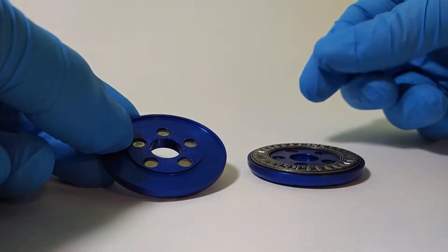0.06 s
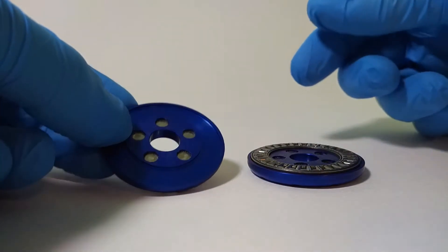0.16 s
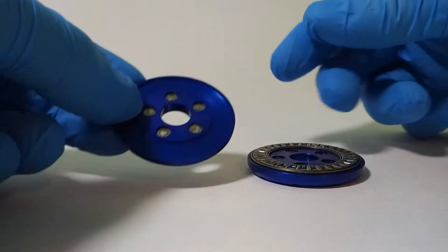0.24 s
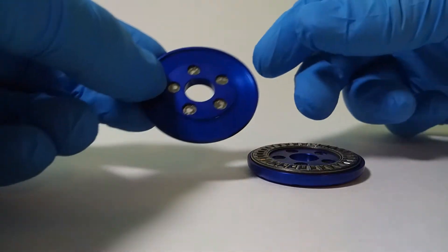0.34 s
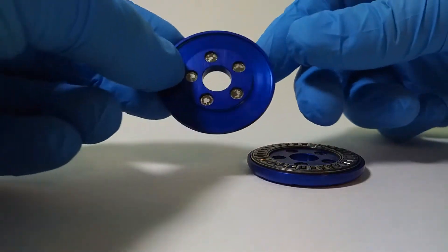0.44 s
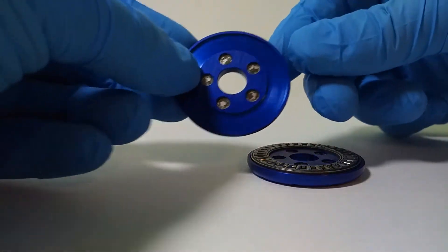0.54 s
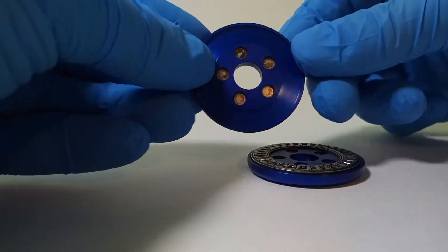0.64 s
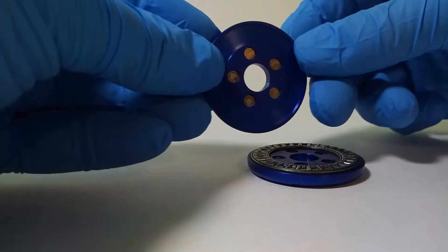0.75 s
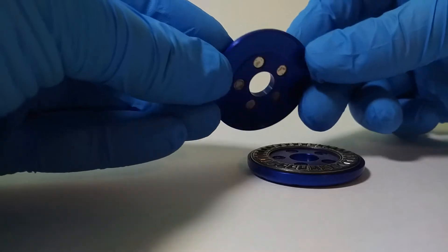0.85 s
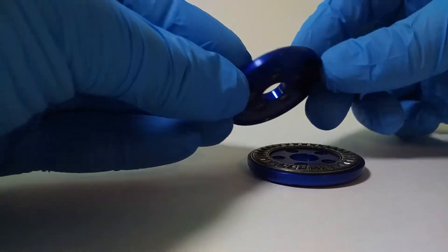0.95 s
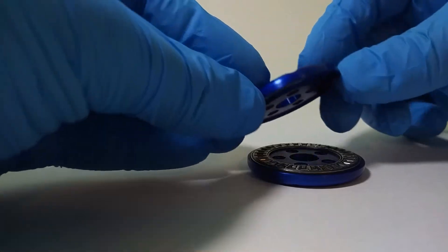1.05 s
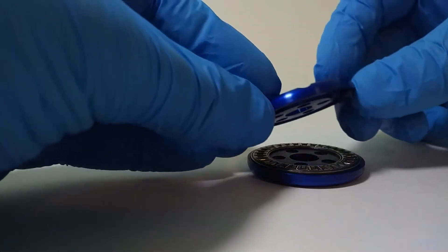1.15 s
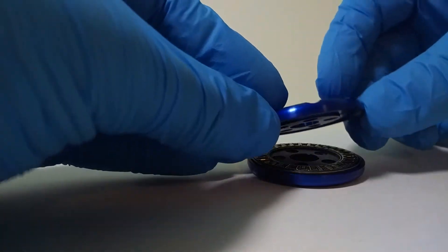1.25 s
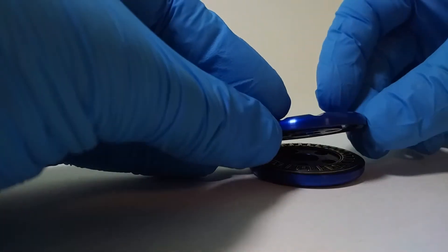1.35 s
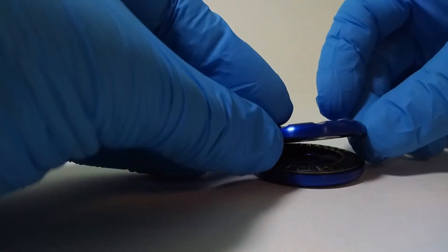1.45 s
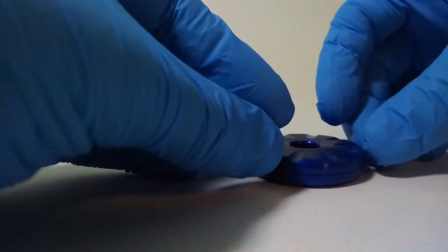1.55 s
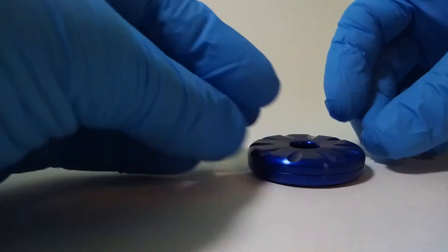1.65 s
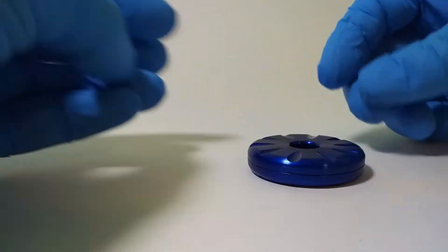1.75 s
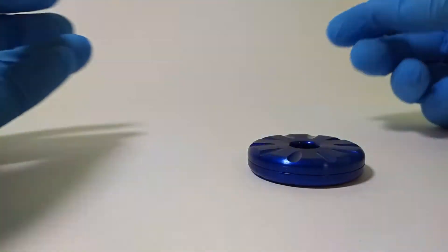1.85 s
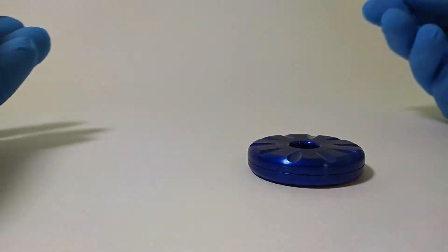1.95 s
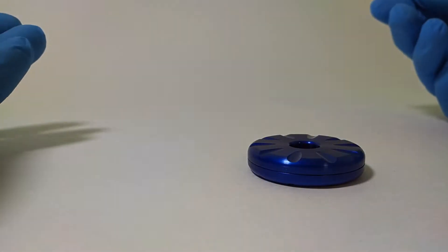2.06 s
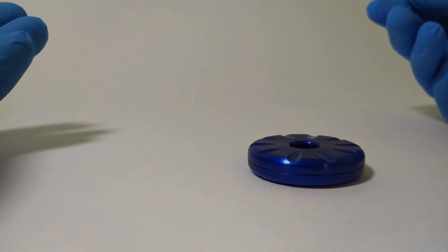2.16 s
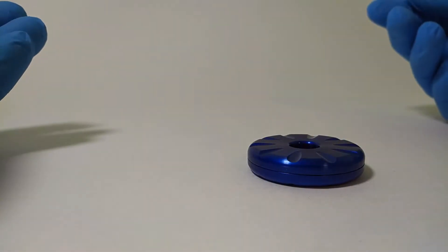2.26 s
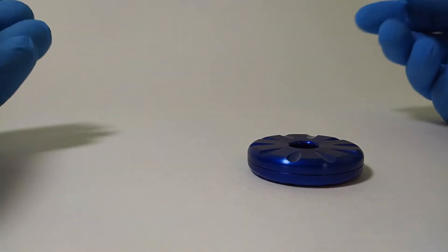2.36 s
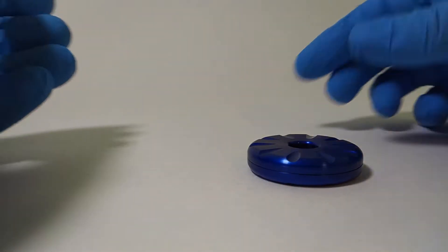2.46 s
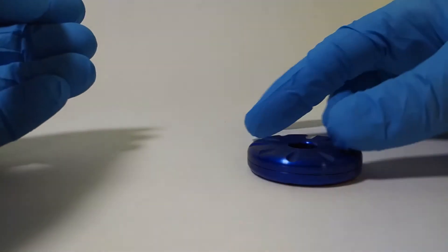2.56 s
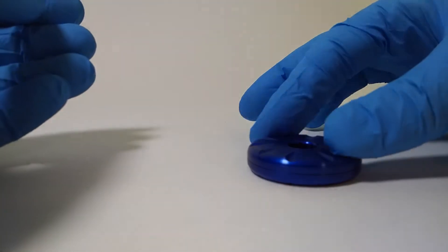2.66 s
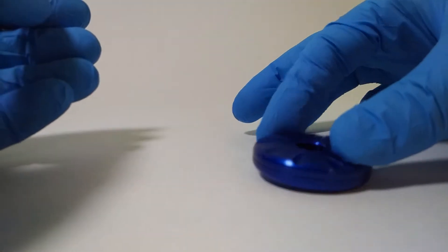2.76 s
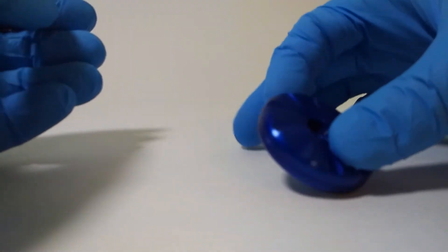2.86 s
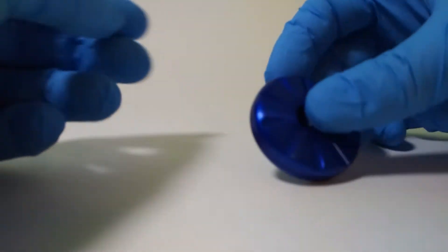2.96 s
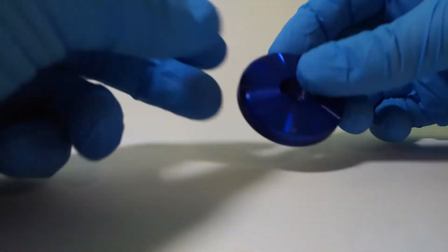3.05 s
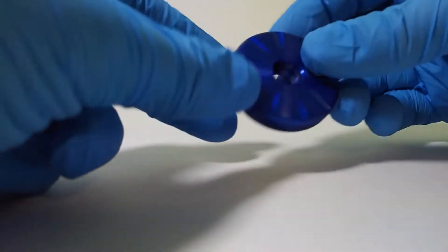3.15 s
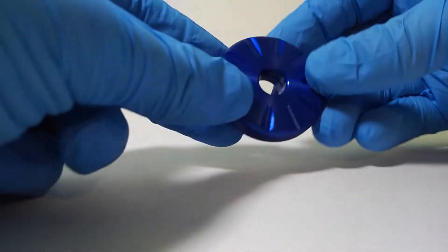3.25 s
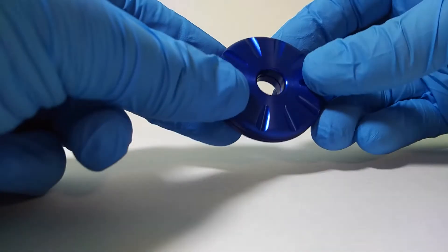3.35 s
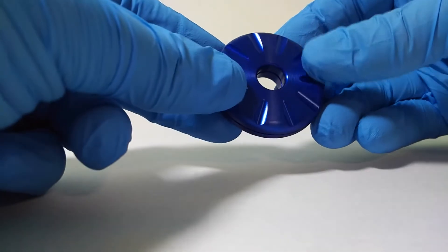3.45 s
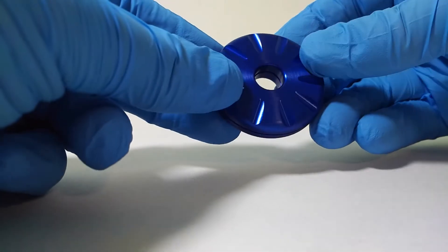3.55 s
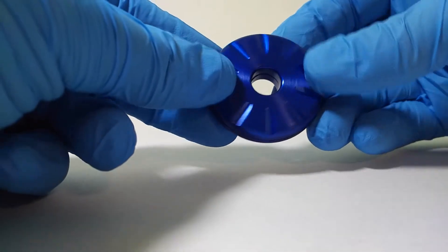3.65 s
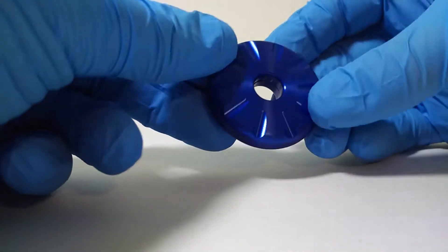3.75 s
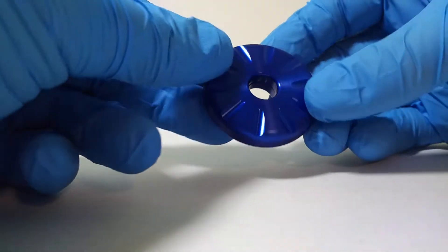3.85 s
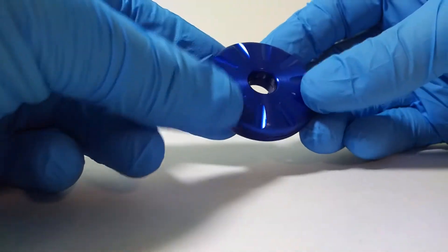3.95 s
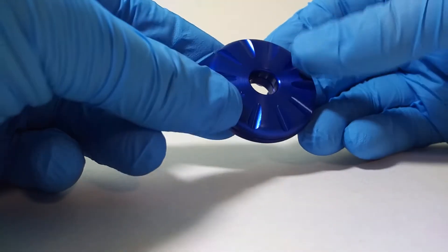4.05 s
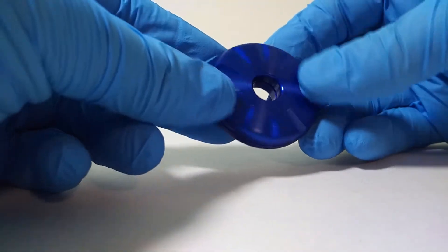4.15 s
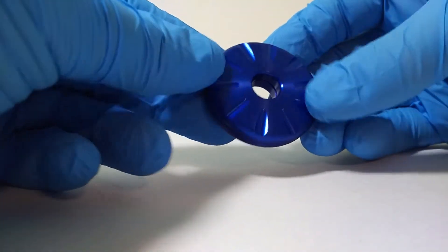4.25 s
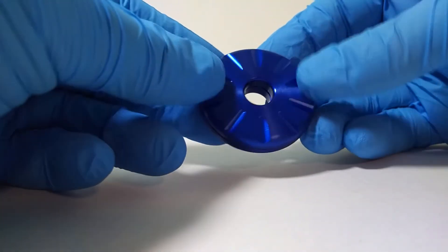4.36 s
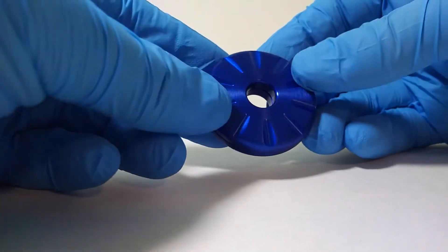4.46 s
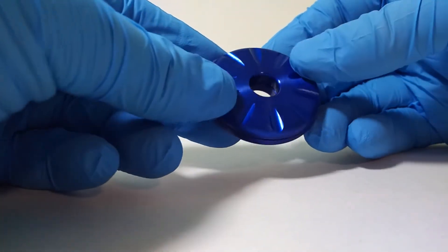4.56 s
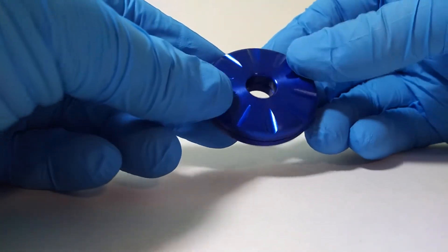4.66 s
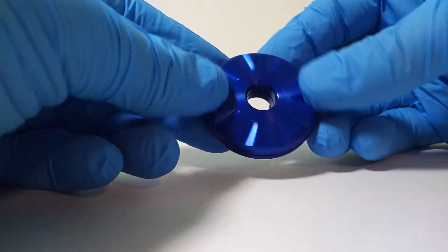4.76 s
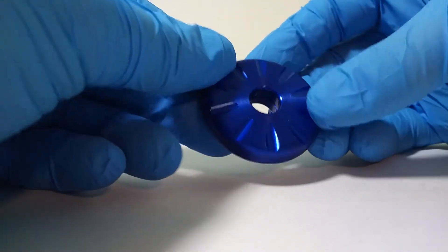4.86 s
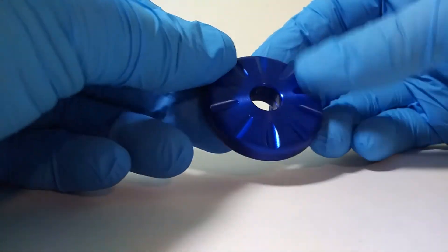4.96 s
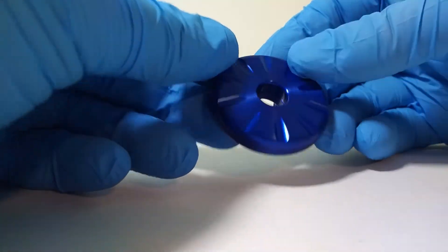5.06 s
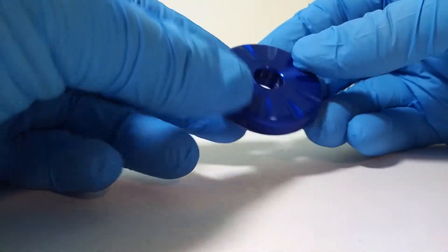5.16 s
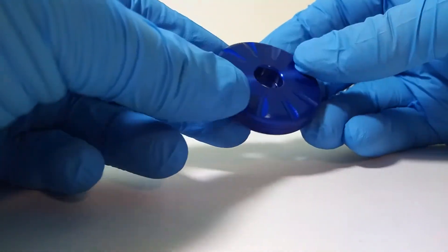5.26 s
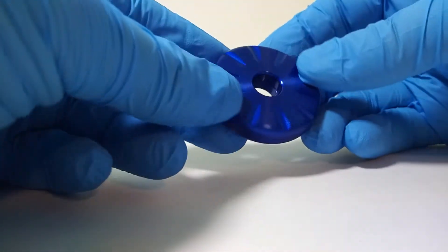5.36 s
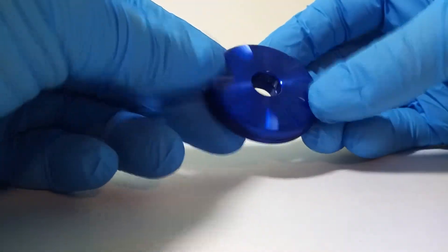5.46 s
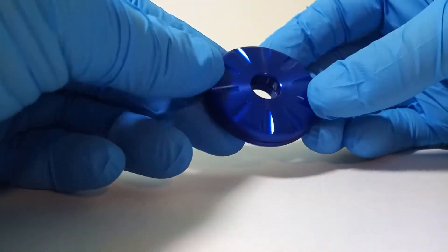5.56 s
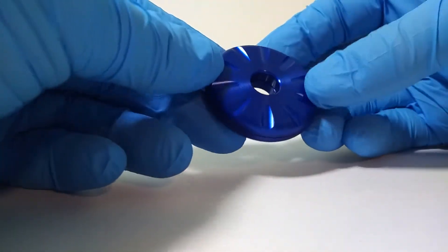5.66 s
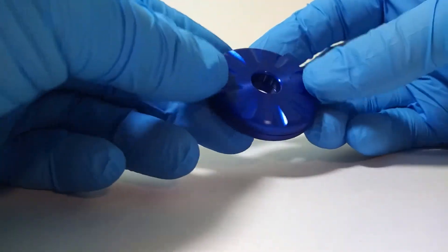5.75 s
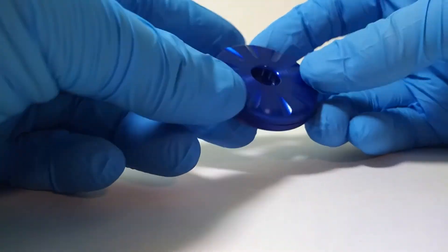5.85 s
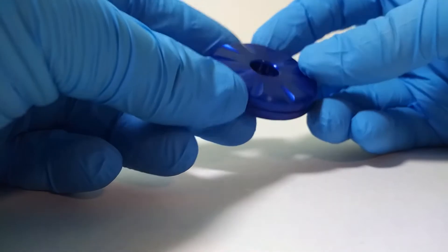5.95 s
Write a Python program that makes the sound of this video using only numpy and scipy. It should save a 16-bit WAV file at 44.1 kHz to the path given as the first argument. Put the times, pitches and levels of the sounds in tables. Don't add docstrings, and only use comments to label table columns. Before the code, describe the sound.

Two small metal discs clack together hard on a desk amid glove rustling, then are lifted and turned with four ratchety metallic clicks.

```python
import sys
import numpy as np
from scipy import signal
from scipy.fft import rfft, irfft
from scipy.io import wavfile
from scipy.ndimage import uniform_filter1d

SR = 44100
rng = np.random.default_rng(int(sys.argv[2]) if len(sys.argv) > 2 else 0)


def materialize(psi):
    bounded = np.clip(np.atleast_2d(psi).T, -1, 1)
    quanta = np.round(bounded * 32767).astype(np.int16)
    wavfile.write(sys.argv[1], SR, quanta)


def gain_from_db(level_db):
    decades = np.asarray(level_db, float) / 20
    return 10 ** decades


N = 264908

# start in [s], crack level in [dB], level of the singing rim in [dB].
SHELL_BLOWS = [
    (1.6278, -16, -5),
    (1.6302, -19, -14),
    (1.6324, -13.5, -7.5),
    (1.636, -12, -7),
    (1.6345, -12.5, -7.5),
    (1.642, -15.5, -5),
    (1.6475, -15, -14.5),
]
# peak in [s], grind level in [dB], rise in [s], fall in [s], jolt in the arms in [dB].
MAGNET_JUMPS = [
    (3.806, -25, 0.0095, 0.0082, -37.5),
    (4.29, -27, 0.018, 0.007, -30),
    (4.901, -17.5, 0.0079, 0.0062, -35.5),
    (5.539, -24.5, 0.0073, 0.01, -36),
]


def level(x, db):
    return x * gain_from_db(db) / np.sqrt(np.mean(x ** 2))


def noise(channels=2, size=N):
    return rng.standard_normal((channels, size))


def stereo(likeness_hz, size=N):
    b, a = signal.butter(1, likeness_hz, fs=SR)
    mid = noise(channels=1, size=size)
    own = noise(size=size)
    return own + signal.lfilter(b, a, mid - own)


def grains(rate, scatter_db):
    hit = (rng.random(N) < rate / SR) * gain_from_db(scatter_db * rng.exponential(size=N))
    return level(hit * (noise(channels=1) + 2.3 * noise()), 0)


def flicker(rate, depth_db):
    hold = int(SR / rate)
    steps = np.repeat(rng.standard_normal(N // hold + 1), hold)
    return gain_from_db(depth_db * uniform_filter1d(steps, hold)[:N])


def swells(t, rows):
    roundness = 1.58
    u = t[::32]
    gain = 0
    for s, db, rise, fall in rows:
        gain = gain + gain_from_db(db) * np.exp(-np.maximum((s - u) / rise, (u - s) / fall) ** roundness)
    return np.interp(t, u, gain)


def colour(x, points):
    hz, db = np.transpose(points)
    size = 2 ** 11
    bins_hz = np.arange(1, size // 2 + 2) * SR / size
    cep = irfft(np.interp(np.log(bins_hz), np.log(hz), db) * np.log(10) / 20)
    cep[1:size // 2] *= 2
    cep[size // 2 + 1:] = 0
    impulse = irfft(np.exp(rfft(cep)))
    return signal.fftconvolve(np.atleast_2d(x), impulse[None], axes=1)[:, :N]


def band(x, hz, width):
    return signal.lfilter(*signal.iirpeak(hz, hz / width, SR), x)


def ring(x, modes):
    out = 0
    for hz, db, t60 in modes:
        r = np.exp(-np.log(1000) / t60 / SR)
        w = 2 * np.pi * hz / SR
        out = out + signal.lfilter([0, gain_from_db(db) * r * np.sin(w)], [1, -2 * r * np.cos(w), r ** 2], x + 1e-18)
    return out


def clicks(rows, spread, ragged):
    out = np.zeros((2, N))
    shape = ragged * rng.standard_normal((len(rows), 2, 24))
    shape[:, :, 0] = 1
    shape = shape * np.exp(-np.arange(24) / spread)
    for (s, db), pair in zip(rows, shape):
        for c, lag in enumerate([0, 6]):
            i = int(s * SR) + lag
            out[c, i:i + 24] += gain_from_db(db) * pair[c]
    return out


def pings(rows, width_s, right_db):
    out = np.zeros((2, N))
    u = np.arange(-60, 60) / SR
    for (s, db, hz), (detune, phase) in zip(rows, rng.standard_normal((len(rows), 2))):
        port_hz = hz * (1 + np.array([[0], [.06 * detune]]))
        turn = 2 * np.pi * port_hz * u + np.array([[0], [phase]])
        i = int(s * SR)
        out[:, i - 60:i + 60] += gain_from_db([[db], [db + right_db]]) * np.exp(-(u / width_s) ** 2) * np.sin(turn)
    return out


def room(x):
    # frequency in [Hz], reverb time in [s].
    reverb_times = [(150, 0.31), (600, 0.61), (2500, 0.73), (6000, 0.42), (11000, 0.36), (16000, 0.096)]
    hz, t60 = np.transpose(reverb_times)
    t = np.arange(SR) / SR
    tail = 0
    for f in 68.9 * 2 ** np.arange(0, 8.1, .5):
        decay = gain_from_db(-60 * t / np.interp(np.log(f), np.log(hz), t60))
        tail = tail + band(stereo(330.0, size=SR), f, f / 3) * decay
    tail = tail * (1 - np.exp(-t / .006))
    return signal.fftconvolve(x, tail, axes=1)[:, :N]


def air(t):
    # frequency in [Hz], level in [dB].
    air_spectrum = [(30, 4), (60, 29), (120, 22), (300, 13), (700, 10), (1500, 10.5), (3700, -6),
                    (6000, -4.5), (9000, -15), (16000, -6.5)]
    # frequency in [Hz], rms level in [dB].
    appliance_tones = [(719, -74), (12355, -78), (13033, -74)]
    tones = 0
    for hz, db in appliance_tones:
        phase = .2 * rng.random((2, 1))
        tones = tones + gain_from_db(db + 3) * np.sin(2 * np.pi * (hz * t + phase))
    return level(colour(stereo(270.0), air_spectrum), -62.5) + tones


def pressed(rows):
    return [(s, db + more_db, rise, fall) for s, db, rise, fall, more_db in rows]


def gloves(t):
    # peak in [s], rustle level in [dB], rise in [s], fall in [s],
    # pressure as rubbing over rustle in [dB].
    strokes = [(.19, -61, 0.041, 0.079, 0), (0.383, -41.5, 0.05, 0.033, -15.5),
               (.642, -47.5, 0.028, 0.054, -14), (.904, -59.5, 0.099, 0.022, -5.5),
               (1.166, -64.5, 0.14, 0.17, 1.5), (1.86, -52.5, 0.17, 0.071, -25),
               (2.055, -61, .02, .03, -12), (1.97, -54.5, .05, 0.079, -3.5),
               (2.466, -45, 0.024, 0.042, -22), (2.5, -44, 0.0234, 0.013, -13),
               (2.606, -48, 0.12, 0.13, -4), (2.823, -47.5, 0.016, 0.063, -3),
               (3.01, -41.5, 0.06, 0.051, -3), (3.232, -53.5, 0.042, 0.15, -8),
               (3.74, -58.5, 0.11, .3, -25), (4.006, -52, 0.03, 0.018, -16),
               (4.098, -49, 0.035, 0.0073, -10), (4.16, -57.5, 0.0088, 0.0049, -1.5),
               (4.42, -61, .1, 0.059, -18), (4.512, -56.5, .05, 0.033, -21), (4.82, -68, 0.043, .2, -14),
               (5.05, -57.5, 0.14, 0.056, -31), (5.25, -52.5, 0.042, 0.014, -11),
               (3.12, -50.5, .05, 0.029, -6), (5.83, -50.5, 0.049, 0.055, -8.5)]
    # time in [s], rustle level in [dB].
    grip = [(0, -59), (.13, -63.5), (1.37, -65), (1.585, -70), (1.626, -50), (1.65, -51), (2.4, -77.5),
            (3.4, -80), (4.2, -78), (4.7, -72), (5.4, -70.5), (5.66, -59), (5.76, -72), (6, -62)]
    # frequency in [Hz], level in [dB].
    rustle_spectrum = [(300, -19), (1000, -15.5), (2500, -6), (4500, -2.5), (7000, -1), (10000, -5.5),
                       (16000, -9)]
    rustle = swells(t, np.array(strokes)[:, :4]) + gain_from_db(np.interp(t, *np.transpose(grip)))
    crackle = .7 * grains(6000, 2.2)
    fabric = level(flicker(60., 2.5) * colour(crackle + stereo(730.0), rustle_spectrum), -3.5)
    rubber = 0.44 * grains(2100, 1.6) + stereo(600.)
    for _ in range(2):
        rubber = band(rubber, 1400.0, 3100.0)
    return rustle * fabric + swells(t, pressed(strokes)) * level(rubber, -0.71)


def shaken(push, modes):
    return level(sum(gain_from_db(db) * band(band(push, hz, 3 * w), hz, w) for hz, w, db in modes), -3.6)


def slides_and_leans(t):
    # peak in [s], drag level in [dB], rise in [s], fall in [s],
    # weight as boom over drag in [dB].
    slides = [(.001, -46, .05, 0.051, -5), (0.2, -47.5, 0.036, 0.046, -14.5), (.4, -69.5, 0.23, 0.15, 2),
              (.9, -69, 0.16, 0.27, -10), (1.624, -38.5, 0.014, .005, -3), (1.97, -63.5, 0.13, 0.51, 3.5),
              (2.46, -64, 0.026, .03, -14), (2.55, -57.5, .03, 0.24, -5.5), (2.86, -47, 0.037, 0.13, -2.5),
              (3.006, -29, 0.038, 0.036, -15.5), (3.06, -43.5, 0.036, 0.076, 5),
              (3.25, -61, 0.082, 0.13, -7.5), (3.74, -72.5, 0.045, 0.08, 4), (4.006, -66, 0.043, 0.13, -19),
              (4.4, -68, .1, .03, -8), (4.61, -66, 0.085, 0.035, -14), (5.25, -63, 0.032, 0.11, -2.5),
              (5.47, -66, 0.085, .1, -15), (5.66, -73, 0.15, 0.04, 11.5), (5.86, -61, 0.13, 0.069, -9),
              (5.982, -59.5, 0.054, 0.033, -7)]
    # peak in [s], level in [dB], rise in [s], fall in [s].
    leans = [(.001, -47.5, .05, 0.069), (.35, -52, 0.11, 0.074), (.58, -54, 0.069, .03),
             (.7, -65, 0.037, .05), (.936, -57, .02, 0.017), (1.116, -59, .05, .02),
             (1.37, -62, .06, 0.035), (2.0, -55, .1, 0.27), (2.606, -40, 0.038, 0.29),
             (2.882, -47, .04, 0.034), (3.01, -37, 0.052, 0.093), (3.28, -49, 0.024, 0.14),
             (3.9, -47.5, .12, 0.051), (4.098, -48.5, 0.053, 0.074), (4.22, -54.5, 0.022, 0.29),
             (4.419, -52, 0.027, .06), (4.6, -58, .1, 0.037), (4.82, -60, 0.05, 0.37),
             (5.05, -53, 0.13, 0.0086), (5.215, -56, 0.029, .03), (5.47, -53, 0.054, .2),
             (5.66, -56, 0.12, 0.036), (5.8, -61, 0.022, 0.046), (5.916, -50.5, .04, 0.027)]
    # frequency in [Hz], width in [Hz], level in [dB].
    drag_modes = [(325, 60, -1.5), (401.3, 20, -0.5), (480, 27, 3), (577, 68, 1.5), (660, 60, -9),
                  (820, 120, -16), (1040, 50, -11), (1400, 200, -18)]
    # frequency in [Hz], width in [Hz], level in [dB].
    boom_modes = [(150.6, 17, -9), (197.4, 17.3, -5.5)]
    # frequency in [Hz], width in [Hz], level in [dB].
    arm_modes = [(53.7, 22.5, 10), (90.3, 17, -6.5)]
    push = flicker(40., 1.6) * stereo(1200.0)
    drag = swells(t, np.array(slides)[:, :4]) * shaken(push, drag_modes)
    boom = swells(t, pressed(slides)) * shaken(push, boom_modes)
    return drag + boom + swells(t, leans) * shaken(push, arm_modes)


def ticks(t):
    # start in [s], peak level in [dB], pitch in [Hz], left minus right in [dB].
    glove_ticks = [(0.3084, -37, 5570, 6), (0.5407, -44, 6130, 18), (0.7061, -33, 5900, 10),
                   (0.8493, -44, 5750, 17), (0.9024, -36, 6100, 5), (2.5944, -28, 5600, 0),
                   (2.9294, -46, 5840, -6), (3.021, -22.5, 5640, 8), (3.2927, -25, 5900, 6),
                   (4.5875, -38, 6180, 12), (4.781, -37.5, 5300, 12.5), (4.8409, -33, 5880, 15),
                   (5.1774, -33, 7800, 6), (5.248, -38, 8000, 4), (2.139, -44, 9000, 0),
                   (5.1978, -36.5, 6020, 23), (5.446, -54, 5800, 3), (5.766, -34, 6240, 9),
                   (5.8046, -37, 6550, 12)]
    # start in [s], peak level in [dB], pitch in [Hz], left minus right in [dB].
    creaks = [(0.556, -47, 770, 0.0087), (.067, -45, 1600, 0), (.089, -47, 1550, 0), (.211, -46, 1350, 0),
              (1.146, -38, 1680, 0.048), (1.171, -36, 1210, 0), (1.273, -49.5, 640, 0),
              (2.506, -36, 684, 0), (2.595, -44, 627, 0), (3.129, -39, 1800, 0.0023),
              (.772, -51, 1100, 0.011), (1.417, -48.5, 1100, 0.01), (3.69, -56, 693, 0.0057),
              (4.014, -44, 1500, 0.018), (4.243, -44, 710, 0.0074), (5.267, -40.5, 1420, 0.034),
              (5.859, -39.5, 1420, 0.0092)]
    out = np.zeros((2, N))
    u = t[:400]
    for s, db, hz, pan_db in [*glove_ticks, *creaks]:
        i = int(s * SR)
        cycles = 1.47 if hz > 4000 else .9
        tick = np.exp(-u * hz / cycles) * np.sin(2 * np.pi * hz * u)
        port_db = db - 8.3 * (hz > 4000) + np.array([pan_db, -pan_db]) / 2
        out[:, i:i + 400] += np.outer(gain_from_db(port_db), tick)
    return out + gain_from_db(-43.5) * room(out)


def snap(t):
    # start in [s], level in [dB].
    touches = [
        (1.5131, -38),
        (1.5142, -43),
        (1.5473, -43),
    ]
    # frequency in [Hz], level in [dB], t60 in [s].
    brushed_modes = [(4850, 0, 0.0087), (5900, -5, .004), (10900, 10.5, 0.0066), (10500, -4, 0.016),
                     (14000, -7, .003)]
    # frequency in [Hz], level in [dB], t60 in [s].
    rim_modes = [(4750, -13, 0.0032), (9330, -22, 0.0094), (10730, -1, 0.0057), (11360, -2.5, 0.0069),
                 (12900, -24.5, 0.01), (14800, -23.5, 0.004)]
    # peak in [s], level in [dB], pitch in [Hz].
    chatter_pings = [(1.628, -4.5, 5750), (1.6305, -9.0, 5520), (1.6314, -4.5, 5820), (1.6336, -2.5, 5880),
                     (1.6359, -5.5, 5990), (1.6373, -3.0, 5870), (1.6386, -6.0, 5520),
                     (1.6396, -11.0, 4430), (1.6411, -7.5, 6060), (1.6421, -1.0, 6280),
                     (1.6441, -9.5, 5750), (1.6463, -8.5, 5960), (1.6477, -3.5, 5450), (1.6499, -3.5, 5720),
                     (1.6532, -10.5, 6470), (1.6543, -12.5, 5810), (1.6562, -16.5, 5370),
                     (1.6577, -13.5, 5470), (1.6589, -11.5, 5980), (1.661, -29.0, 5850),
                     (1.6624, -13.0, 5800), (1.6637, -16.0, 5780)]
    # peak in [s], level in [dB], pitch in [Hz].
    rim_pings = [(1.6285, -9.0, 11320), (1.6295, -14.0, 11350), (1.631, -18.0, 10950),
                 (1.6333, -14.0, 10850), (1.6344, -10.0, 11050), (1.6362, -14.5, 11150),
                 (1.6373, -8.5, 11040), (1.6384, -15.5, 10850), (1.6412, -15.0, 11060),
                 (1.6425, -14.5, 11250), (1.6441, -19.0, 10850), (1.6472, -15.5, 11560),
                 (1.6488, -16.5, 10940), (1.6573, -18.0, 10820)]
    # frequency in [Hz], level in [dB].
    crack_spectrum = [(100, 28), (600, 16.5), (2000, 20), (5500, 11.5), (8500, 12), (12500, -5),
                      (16000, -15)]
    s, crack_db, rim_db = np.transpose(SHELL_BLOWS)
    crack = colour(clicks(np.c_[s, crack_db], 9.0, 0.3)[0], crack_spectrum)
    rim = gain_from_db(-7.0) * ring(clicks(np.c_[s, rim_db], 3.1, 0.79), rim_modes)
    rim = rim + gain_from_db(-1.2) * pings(rim_pings, .0005, -1.5)
    chatter = gain_from_db(-13.0) * pings(chatter_pings, 0.00035, 3)
    brush = gain_from_db(5.0) * ring(clicks(touches, 1.4, .3), brushed_modes)
    metal = chatter + rim + crack + brush
    return metal + room(metal * gain_from_db(np.where(t < 1.6, -45, -36)))


def desk_knock(t):
    # start in [s], level in [dB].
    landings = [
        (1.514, -28.5),
        (1.55, -34.5),
        (1.632, 3),
    ]
    # frequency in [Hz], level in [dB], t60 in [s], left port's lead in [radians].
    desk_modes = [(58.3, -6, .35, 1.6), (66, -2.5, 0.71, 0.97), (88.5, -2, 0.98, 1.8),
                  (98.3, -6, 0.72, 0.85), (124.4, -9, 0.72, 0.72), (159, 0.5, 0.73, 0.55),
                  (203, 2.5, 0.33, 0.354), (243, -5.5, 0.79, .3), (274, 3.5, 0.28, 0.27),
                  (351, -8.5, 0.17, 0.294), (420, -10, 0.16, .3),
                  (492, -15, 1.1, 0.32), (517, -28, 2.5, 0.38), (536, -3.5, 0.27, .3),
                   (615, 4.5, 0.45, .3), (640, -14, 1.07, 0.17), (950, 2, 0.51, .6),
                   (980, -14.5, 0.66, 0.655)]
    # frequency in [Hz], level in [dB], t60 in [s].
    board_modes = [(918, -1, .4), (1095, -3, .3), (1350, -3, .25), (1485, -3, .2), (1707, -4, .3),
                   (1884, -5, .2), (2121, -1, .15), (2342, -4, .12), (2700, -4, .1), (3079, -2, .16),
                   (3390, -6, .2), (3741, -3, .16), (4100, -4, .08), (4540, -8, .1)]
    # frequency in [Hz], level in [dB].
    wood_spectrum = [(30, -20.5), (55, -1.5), (100, -7.5), (250, 4.5), (600, 0.5), (1200, -4.5),
                     (2200, -12), (4000, -16), (7000, -26.5), (16000, -36)]
    landing = clicks(landings, 0.65, 0.066)[0]
    push = uniform_filter1d(landing, size=40)
    shake = 0
    for s, db in landings:
        since = np.maximum(t - s, 0)
        shake = shake + gain_from_db(db) * since / 0.012 * np.exp(1 - since / 0.015)
    rattle = gain_from_db(-20) * shake * level(colour(stereo(900.), wood_spectrum), 0)
    echo = gain_from_db(-10.0) * room(colour(landing, wood_spectrum))
    s, crack_db, _ = np.transpose(SHELL_BLOWS)
    desk = gain_from_db(3.0) * ring(clicks(np.c_[s + .004, crack_db], 4.0, .8), board_modes)
    for hz, db, t60, lead in desk_modes:
        pole = np.exp((2j * np.pi * hz - np.log(1000) / t60) / SR)
        port_phase = np.exp(.5j * lead * np.array([[1], [-1]]))
        desk = desk + (signal.lfilter([gain_from_db(db)], [1, -pole], push) * port_phase).imag
    return gain_from_db(-24.0) * desk + rattle + echo


def lift(t):
    start_s, rise_s, fall_s = 3.035, 0.017, 0.039
    return swells(t, [(start_s + rise_s, -29.5, rise_s, fall_s)]) * np.sin(2 * np.pi * 201 * t)


def turns(t):
    # peak in [s], level in [dB], pitch in [Hz].
    turn_contacts = [(3.7933, -22.0, 5670), (3.7955, -14.5, 5510), (3.7964, -14.0, 5590),
                     (3.7994, -9.0, 5980), (3.8003, -14.5, 5780), (3.8017, -1.0, 5860),
                     (3.8038, -11.5, 5910), (3.8057, -5.0, 5640), (3.8067, -10.0, 5570),
                     (3.8076, -10.5, 5320), (3.8097, -9.5, 6120), (3.8114, -13.5, 5770),
                     (3.8125, -16.0, 6090), (3.8141, -16.5, 5670), (4.2658, -22.0, 5400),
                     (4.2695, -22.0, 5590), (4.2737, -19.0, 5900), (4.2755, -23.5, 5490),
                     (4.2793, -17.0, 5710), (4.283, -13.0, 5710), (4.2845, -13.5, 5720),
                     (4.2854, -20.0, 5760), (4.2865, -7.0, 5990), (4.2883, -3.5, 5530),
                     (4.2892, -10.0, 5760), (4.2902, -8.0, 5800), (4.292, -6.0, 5720),
                     (4.2931, -10.0, 5830), (4.2952, -11.0, 5650), (4.2965, -14.5, 5720),
                     (4.2982, -21.0, 5680),
                     (4.8899, -17.0, 5960), (4.8913, -20.5, 5290), (4.8923, -11.5, 5910),
                      (4.894, -16.5, 5950), (4.8949, -21.0, 5690), (4.8974, -1.5, 5850),
                      (4.8986, -9.0, 5530), (4.9007, -0.5, 5620), (4.9022, -8.0, 5500),
                      (4.9037, -9.0, 5130), (4.9065, -16.0, 5530), (4.9075, -11.0, 6460),
                      (4.909, -17.5, 5080), (4.9116, -20.5, 5490), (4.9139, -20.5, 5350),
                      (4.9157, -21.5, 6000), (5.5241, -21.0, 6020), (5.5251, -20.5, 6320),
                      (5.533, -24.5, 5960), (5.534, -22.5, 6010), (5.536, -6.0, 6320),
                      (5.5372, -13.0, 5600), (5.539, -13.0, 5510), (5.5402, -18.0, 5550),
                      (5.5415, -1.0, 6260), (5.5429, -17.0, 5550), (5.5449, -7.0, 5710),
                      (5.5462, -16.5, 5980), (5.5473, -14.0, 5710), (5.5511, -14.5, 5890),
                      (5.5536, -24.0, 5650), (5.555, -20.5, 5640)]
    # start in [s], level in [dB].
    hard_slaps = [
        (3.8018, -20),
        (3.8058, -21),
        (4.2883, -30),
        (4.9007, -12),
        (5.5251, -36),
        (5.5305, -34),
        (5.5362, -23),
        (5.5416, -19),
        (4.8971, -24),
        (4.2748, -38),
    ]
    # frequency in [Hz], level in [dB], t60 in [s].
    closed_modes = [(1700, -9, .01), (4530, -5, .018), (5000, -8, .015), (2900, -24, .006),
                    (6500, -16, .015), (10600, -26, .015), (13500, -24, .008)]
    # frequency in [Hz], level in [dB].
    grind_spectrum = [(300, -16.5), (1000, -16), (1700, -5), (2800, -12), (4600, 1), (6000, 2), (8000, -8),
                      (12000, -12.5), (16000, -28)]
    swell = 0
    for s, db, rise, fall, _ in MAGNET_JUMPS:
        swell = swell + gain_from_db(db) * np.exp(np.minimum((t - s) / rise, (s - t) / fall))
        swell = swell + gain_from_db(db - 23) * np.exp(np.minimum((t - s) / 0.062, (s - t) / 0.037))
    grind = gain_from_db([[0], [-4]]) * colour(swell * grains(9000, 1.6), grind_spectrum)
    contacts = gain_from_db(-11.3) * pings(turn_contacts, 0.00036, -3.0)
    bass_cut = signal.butter(2, 1300, "high", fs=SR, output="sos")
    slaps = signal.sosfilt(bass_cut, clicks(hard_slaps, 1.8, .3))
    shells = gain_from_db(-6.0) * ring(slaps, closed_modes)
    clack = gain_from_db(15.5) * band(band(slaps, 5950.0, 6000.0), 4300.0, 8100.0)
    metal = grind + contacts + clack
    return metal + shells + room(gain_from_db(-49) * metal + gain_from_db(-48.5) * shells)


def jolts(t):
    out = 0
    for s, _, _, _, jolt_db in MAGNET_JUMPS:
        late = np.maximum(t - s - .008, 0)
        thud = late / 0.019 * np.exp(1 - late / 0.016)
        out = out + gain_from_db(jolt_db) * thud * np.sin(2 * np.pi * 57.5 * late)
    return out


def scene():
    t = np.arange(N) / SR
    hands = gloves(t) + slides_and_leans(t) + ticks(t)
    return air(t) + hands + snap(t) + desk_knock(t) + lift(t) + turns(t) + jolts(t)


def top_cut(x):
    return signal.sosfilt(signal.butter(12, 15830, fs=SR, output="sos"), x)


def record(dry):
    # frequency in [Hz], width in [Hz], level in [dB].
    ports = [(5913, 1210, 13.5), (5120, 16000, -16)]
    x = np.array([v + gain_from_db(db) * band(v, hz, w) for v, (hz, w, db) in zip(dry, ports)])
    x = x + gain_from_db(-61.0) * noise()
    x = signal.sosfilt(signal.butter(5, 45, "high", fs=SR, output="sos"), x)
    x = np.tanh(1.2 * x) / 1.3
    mix = signal.sosfilt(signal.ellip(8, .2, 70, 15750, fs=SR, output="sos"), x)
    return top_cut(mix)


dry = scene()
out = record(dry)
materialize(out)
```